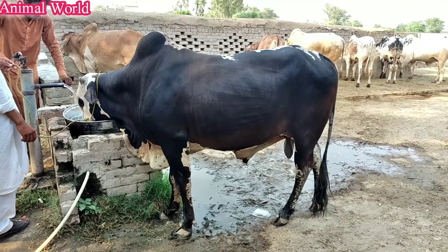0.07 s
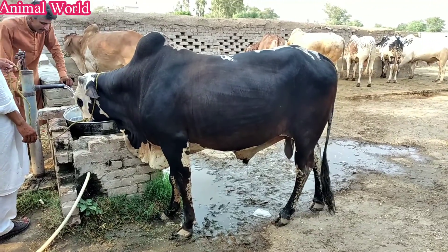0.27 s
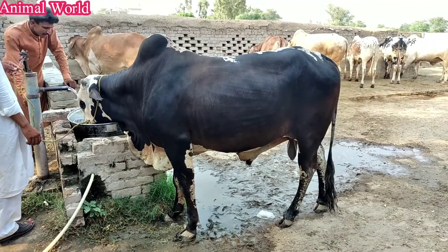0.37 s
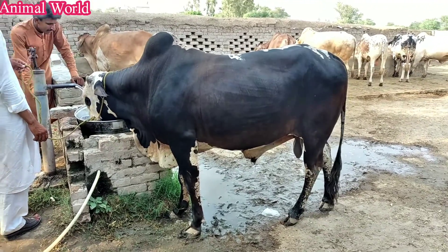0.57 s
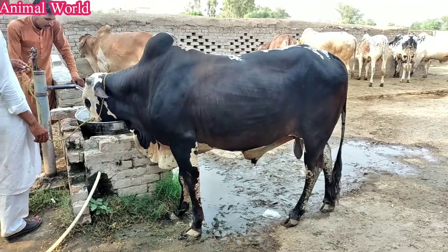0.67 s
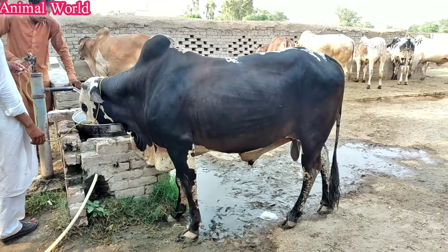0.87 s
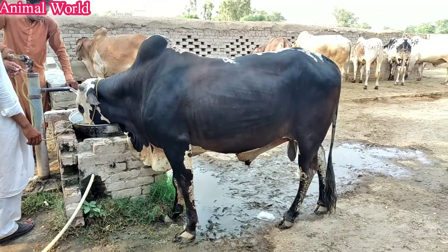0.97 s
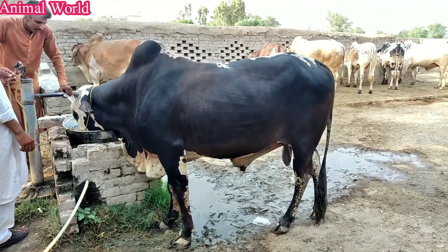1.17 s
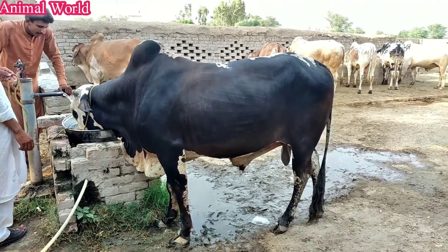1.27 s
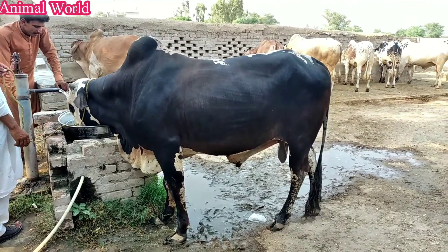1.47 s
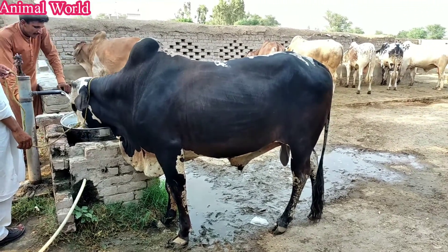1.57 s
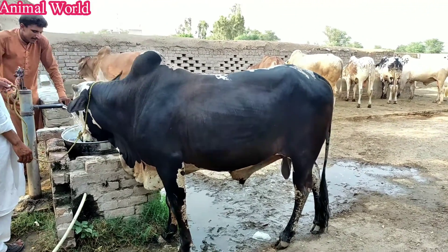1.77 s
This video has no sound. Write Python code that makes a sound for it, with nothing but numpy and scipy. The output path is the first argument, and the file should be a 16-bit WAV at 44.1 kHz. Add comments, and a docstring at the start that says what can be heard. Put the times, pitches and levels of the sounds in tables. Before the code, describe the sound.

A bull drinks from a metal bowl: a strong squelching slurp, a softer lip smack, then two more sharp slurps with gulps and faint bowl plinks, close up in a quiet brick-walled yard.

```python
"""In a brick-walled farmyard a bull drinks from a metal bowl: three sharp slurps and a softer smack of the lips.
Each slurp draws air and water past the lips: crackling noise and bubble rings make a wet squelch and fine spray.
Wavering tones make the lip squeaks, the plinking bowl and the hollow gulps; low noise makes thuds and sloshes.
Decaying noise gives the short echo off the walls, and steady coloured noise the faint outdoor murmur of air."""
import sys
import numpy as np
from scipy import signal
from scipy.fft import rfft, irfft, next_fast_len
from scipy.io import wavfile
from scipy.ndimage import uniform_filter1d

SR = 44100
rng = np.random.default_rng(int(sys.argv[2]) if len(sys.argv) > 2 else 0)


def wav_record(signal):
    """Record a signal, one row per channel, as 16-bit PCM in the file named by sys.argv[1]."""
    frames = np.transpose(np.atleast_2d(signal))
    bounded = np.clip(frames, -1, 1)
    # unit amplitude maps onto the largest positive 16-bit level
    quanta = np.round(bounded * 32767).astype(np.int16)
    wavfile.write(sys.argv[1], SR, quanta)


N = 79380
T = np.arange(N) / SR
EVENT_T = T[:SR // 4]  # time within one short event
SIZE = next_fast_len(N + 8192)  # padded length for filtering
HZ = np.fft.rfftfreq(SIZE, 1 / SR)

# colour of the wet squelch, for both its noise and its bubbles: f/Hz, relative level/dB per Hz
SQUELCH_COLOUR = [(200, -20), (600, -5), (900, 1), (1550, 2), (2650, 2.5), (3250, -8), (4200, -19),
                  (16000, -65)]


def sucks():
    """Air and water rush past the lips: a wet squelch that makes the bowl sing, a fine spray and tiny ticks."""
    # bursts of suction: t/s, rise/s, time to fade 20 dB/s, squelch level before trim/dB, spray level before trim/dB
    suction = [(-.01, .01, .1, -64, -54), (.126, .005, .025, -51, -41), (.136, .005, .025, -41, -48),
               (.166, .022, .045, -44, -43), (.208, .005, .02, -32, -26), (.226, .003, .03, -30, -32),
               (.239, .005, .015, -22, -22), (.263, .003, .025, -31, -43), (.276, .008, .03, -30, -38),
               (.557, .003, .03, -41, -51), (.585, .016, .06, -51, -52), (.637, .003, .026, -42, -64),
               (.77, .016, .06, -45, -46), (.825, .002, .05, -50, -46), (.857, .004, .03, -53, -39),
               (.883, .004, .03, -44, -42), (.893, .005, .028, -28, -25), (.918, .012, .04, -36, -44),
               (.943, .005, .016, -35, -39), (.96, .012, .08, -59, -51), (1.145, .048, .04, -50, -50),
               (1.23, .008, .024, -40, -32), (1.255, .02, .04, -38, -38), (1.274, .012, .03, -33, -35),
               (1.292, .005, .035, -27, -39), (1.318, .008, .028, -36, -54)]
    # tiny bubbles bursting: t/s, relative level/dB
    tick_times = [(.21, -43), (.826, -37), (.859, -55), (.896, -39), (1.232, -47)]
    # colour of the fine spray: f/Hz, relative level/dB per Hz
    spray_colour = [(1000, -35), (3200, -18), (4300, -6), (5200, -1.5), (6700, 1), (7700, -11),
                    (10000, -17.5), (16000, -35)]
    # colour of the ticks: f/Hz, relative level/dB per Hz
    tick_colour = [(1000, -30), (12000, 0), (16000, -8)]
    squelch_trim_db, spray_trim_db = 4, -.5
    bubble_share = .6  # share of the squelch power
    bowl_hz, bowl_width_hz, bowl_db = 1071, 32, 3  # bowl resonance, added to the direct squelch
    tick_rise_s, tick_fade_s = .0005, .008

    froth = np.sqrt(1 - bubble_share) * crackle(SQUELCH_COLOUR) + np.sqrt(bubble_share) * bubbles()
    squelch_envelope = bursts((s, rise, fade, db) for s, rise, fade, db, _ in suction)
    squelch = steady(froth, size=400) * squelch_envelope
    spray_envelope = bursts((s, rise, fade, db) for s, rise, fade, _, db in suction)
    spray = steady(crackle(spray_colour), size=400) * spray_envelope

    bowl_resonance = amp(bowl_db) / (1 + 2j * (HZ - bowl_hz) / bowl_width_hz)
    squelch = shape(squelch, 1 + bowl_resonance)

    hiss = unit(shape(rng.standard_normal(N), amp(read(tick_colour, HZ))))
    ticks = hiss * bursts((s, tick_rise_s, tick_fade_s, db) for s, db in tick_times)
    return amp(squelch_trim_db) * squelch + amp(spray_trim_db) * spray + ticks


def bubbles(count=48):
    """A swarm of small bubbles, each a brief ring that rises in pitch."""
    # lowest and highest starting pitch of the bubbles: f/Hz
    pitch_range = (800, 3300)
    bubbles_per_s = 900  # mean, over all pitches together
    cycles = 9  # a bubble dies to 1/e in this many cycles of its starting pitch
    pitch_rise = .04  # share by which its pitch climbs meanwhile
    out = np.zeros(N)
    for hz in np.geomspace(*pitch_range, count):
        age = EVENT_T * hz / cycles
        turns = np.cumsum(hz * (1 + pitch_rise * age)) / SR
        ring = np.exp(-age) * np.sin(2 * np.pi * turns)
        born = rng.random(N) < bubbles_per_s / count / SR
        births = born * rng.standard_normal(N)
        out += hz * amp(read(SQUELCH_COLOUR, hz)) * signal.oaconvolve(births, ring)[:N]
    return steady(unit(out)[None], size=900)


def squeaks():
    """Narrow gaps between wet lips whistle roughly: brief tones of unsteady pitch."""
    # squeaks of wet lips: t/s, relative level/dB, f/Hz
    whistles = [(.134, -46, 1970), (.24, -31, 1900), (.242, -31, 2600), (.558, -45, 2560),
                (.777, -41, 2830), (.796, -46, 2520), (.894, -28, 2440), (1.281, -35, 2550)]
    rise_s, fade_s, waver = .005, .026, .035  # fade is per 20 dB; waver is the rms share of the pitch
    out = np.zeros(N)
    for s, db, hz in whistles:
        turns = np.cumsum(hz * (1 + waver * wander(size=40))) / SR
        tone = np.sin(2 * np.pi * turns)
        add(out, s, np.sqrt(2) * amp(db) * swell(rise_s, fade_s) * tone)
    return out


def plinks():
    """Each pop rings the modes of the bowl for a moment; the moving water makes its pitch waver."""
    # pops that ring the bowl: t/s, relative level/dB, f/Hz
    pops = [(.114, -45, 1050), (.129, -31, 1080), (.177, -31, 1070), (.206, -29, 770), (.2114, -18, 1060),
            (.232, -19, 1090), (.243, -12, 1072), (.638, -33, 1090), (.823, -39, 1040), (.858, -35, 1060),
            (.894, -22, 1045), (.897, -26, 900), (.948, -36, 1020), (1.234, -31, 1070), (1.282, -28, 1075),
            (1.304, -29, 1050)]
    # modes of the bowl: ratio to the pitch, relative level/dB
    modes = [(1, 0), (1.145, -21), (2.36, -23)]
    rise_s, fade_s, waver = .004, .026, .018  # fade is per 20 dB; waver is the rms share of the pitch
    pan_db = 1.5  # up on the left, down on the right
    out = np.zeros(N)
    for s, db, hz in pops:
        turns = np.cumsum(hz * (1 + waver * wander(size=60))) / SR
        ring = sum(amp(mode_db) * np.sin(2 * np.pi * ratio * turns) for ratio, mode_db in modes)
        add(out, s, np.sqrt(2) * amp(db) * swell(rise_s, fade_s) * ring)
    return out * amp([[pan_db], [-pan_db]])


def gulps():
    """Hollow, wavering tones of air pockets that glide as they shrink or swell."""
    # air pockets in the mouth: t/s, time to fade 20 dB/s, relative level/dB, starting f/Hz, glide/Hz per s
    pockets = [(.13, .022, -44, 390, 300), (.178, .06, -38, 455, 900), (.208, .018, -31, 480, 600),
               (.226, .03, -35, 122, 0), (.248, .03, -32, 420, -900), (.282, .055, -33, 340, -600),
               (.293, .028, -35, 475, 200), (.564, .07, -38, 365, -300), (.637, .016, -35, 385, 600),
               (.664, .025, -42, 360, 100), (.776, .07, -43, 338, -200), (.853, .05, -45, 325, -500),
               (.898, .024, -29.5, 380, 2200), (.932, .028, -36, 460, -400), (1.163, .09, -44, 380, 700),
               (1.231, .02, -33, 365, 3500), (1.259, .05, -34, 480, 500), (1.29, .055, -24.5, 335, 200),
               (1.312, .045, -29, 255, 200), (1.39, .08, -45, 275, -100), (1.593, .03, -42, 180, 100)]
    rise_s, waver = .012, .07  # waver is the rms share of the starting pitch
    out = np.zeros(N)
    for s, fade, db, hz, glide in pockets:
        pitch = hz * (1 + waver * wander(size=100)) + glide * EVENT_T
        tone = np.sin(2 * np.pi * np.cumsum(pitch) / SR)
        add(out, s, np.sqrt(2) * amp(db) * swell(rise_s, fade) * tone)
    return out


def sloshes():
    """Water drops back into the bowl with a thud and churns: two low bands of crackling noise."""
    # water falling back: t/s, rise/s, time to fade 20 dB/s, relative thud level/dB, relative churn level/dB
    falls = [(.222, .018, .04, -31, -30), (.275, .016, .045, -45, -35), (.636, .008, .03, -52, -40),
             (.89, .008, .05, -49, -41), (1.286, .008, .045, -29, -30.5), (1.315, .018, .042, -50, -29.5),
             (1.597, .005, .035, -45, -53)]
    # colour of the low thud: f/Hz, relative level/dB per Hz
    thud_colour = [(20, -30), (52, -5), (80, -15), (120, 0), (260, 0), (700, -35), (2000, -70)]
    # colour of the churning: f/Hz, relative level/dB per Hz
    churn_colour = [(100, -35), (250, -2), (490, 0), (600, -11), (800, -14), (4000, -60)]
    thud_envelope = bursts((s, rise, fade, db) for s, rise, fade, db, _ in falls)
    thud = steady(crackle(thud_colour), size=900) * thud_envelope
    churn_envelope = bursts((s, rise, fade, db) for s, rise, fade, _, db in falls)
    churn = steady(crackle(churn_colour), size=600) * churn_envelope
    return thud + churn


def crackle(colour):
    """A dense run of bursting bubbles of uneven size, in one colour, more scattered in the treble."""
    grain_db, grain_s = 4.5, .0012  # rms unevenness before limiting, and length, of the bursts
    spread, spread_hz = .45, 450  # greatest power share that differs between the ears; half of it at this pitch
    unevenness = unit(uniform_filter1d(rng.standard_normal(N), max(2, int(grain_s * SR))))
    sizes = amp(grain_db * np.clip(unevenness, -2, 2))
    apart = np.clip(spread, 0, 1) * HZ ** 2 / (HZ ** 2 + spread_hz ** 2)
    gain = amp(read(colour, HZ))
    shared = rng.standard_normal(N) * sizes
    own = rng.standard_normal((2, N)) * sizes
    return unit(shape(shared, gain * np.sqrt(1 - apart)) + shape(own, gain * np.sqrt(apart)))


def near(x):
    """Quick reflections from bowl and trough: sparse, dying taps, different at each ear."""
    level_db, t60_s, taps_per_s = -4, .09, 1500  # level is relative to the direct sound
    t = T[:SR // 10]
    strengths = rng.standard_normal((2, len(t)))
    present = rng.random((2, len(t))) < taps_per_s / SR
    taps = strengths * present * amp(-60 * t / t60_s)
    taps /= np.linalg.norm(taps, axis=1, keepdims=True)
    reflected = signal.fftconvolve(x, taps, axes=1)[:, :N]
    return (x + amp(level_db) * reflected) / np.sqrt(1 + amp(level_db) ** 2)


def yard(x):
    """The echo of the brick walls: a noise tail, each band dying at its own speed."""
    # echo of the walls: f/Hz, relative level/dB, time to die by 60 dB/s
    walls = np.array([(100, -25, .3), (300, -14, .5), (1000, -17, .35), (2500, -19, .28), (4000, -20, .22),
                      (6000, -11, .25), (9000, -10, .3), (15000, -17, .22)])
    hz, t, bands = signal.stft(rng.standard_normal((2, SR)), SR, nperseg=256)
    t60 = read(walls[:, [0, 2]], hz)[:, None]
    decay = amp(read(walls[:, :2], hz)[:, None] - 60 * t / t60)
    gain = decay * np.sqrt(2 * np.log(1000) / (t60 * SR))  # equal energy for long and short tails
    tail = signal.istft(bands * gain, SR, nperseg=256)[1][:, :SR]
    tail = tail * np.minimum(T[:SR] / .012, 1)  # 12 ms fade-in
    return signal.fftconvolve(x, tail, axes=1)[:, :N]


def air():
    """The dull background of the open yard: coloured noise, partly alike at both ears."""
    # colour of the air: f/Hz, relative level/dB per Hz
    air_colour = [(20, -15), (48, -1), (150, -16), (280, -10), (420, -17), (750, -10), (1100, -16),
                  (1900, -21.5), (2600, -28), (3400, -48), (15000, -66)]
    # loudness of the air over time: t/s, level/dB
    air_level = [(0, -54), (.08, -56), (1.66, -57), (1.74, -52)]
    # likeness of left and right: f/Hz, correlation
    likeness = [(50, .9), (1000, .5), (4000, .3)]
    a, b = rng.standard_normal((2, N))
    same = np.clip(read(likeness, HZ), -1, 1)
    gain = amp(read(air_colour, HZ))
    left = shape(a, gain)
    right = shape(a, gain * same) + shape(b, gain * np.sqrt(1 - same ** 2))
    return unit(np.array([left, right])) * amp(np.interp(T, *np.transpose(air_level)))


def amp(db):
    """Decibels to gain."""
    return 10 ** (np.asarray(db) / 20)


def unit(x):
    """Scales to rms 1."""
    return x / np.sqrt(np.mean(x ** 2) + 1e-20)


def read(points, hz):
    """Reads a table on a log-frequency axis."""
    f, value = np.transpose(points)
    return np.interp(np.log(hz + 1), np.log(f + 1), value)


def shape(x, gain):
    """Filters by a gain for each frequency."""
    return irfft(rfft(x, SIZE) * gain, SIZE)[..., :N]


def steady(x, size):
    """Evens out the level over size samples, jointly for all channels."""
    return x / np.sqrt(uniform_filter1d(np.mean(x ** 2, axis=0), size) + 1e-9)


def swell(rise, fade):
    """Rises smoothly, then dies by 20 dB in each fade time."""
    attack = np.sin(np.pi / 2 * np.minimum(EVENT_T / rise, 1))
    return attack * amp(-20 * np.maximum(EVENT_T - rise, 0) / fade)


def bursts(rows):
    """The joint envelope of rows: t/s, rise/s, fade/s, level/dB."""
    out = np.zeros(N)
    for s, rise, fade, db in rows:
        add(out, s, amp(db) * swell(rise, fade))
    return out


def wander(size):
    """Random drift of rms 1 for the length of one event, smoothed over size samples."""
    return unit(uniform_filter1d(rng.standard_normal(len(EVENT_T)), size))


def add(mix, s, sound):
    """Mixes a sound in at time s, cutting what falls outside."""
    at = round(s * SR)
    sound = sound[max(-at, 0):]
    part = mix[max(at, 0):][:len(sound)]
    part += sound[:len(part)]


def scene():
    """The drinking reaches the right microphone first; the yard answers over the murmur of air."""
    # balance of the drinking between the ears: f/Hz, left minus right/dB
    balance = [(200, .5), (650, -3.5), (1100, 1), (3000, 0), (5500, 11.5), (7000, 5.5), (9000, -2.5),
               (15000, -7)]
    left_lag_s = .00023
    mouth = near(sucks() + squeaks()) + plinks() + gulps() + sloshes()
    side = amp(np.array([[.5], [-.5]]) * read(balance, HZ))
    side_gain = side / np.sqrt(np.mean(side ** 2, axis=0))  # keeps the mean power of the pair
    lag = np.exp(-2j * np.pi * HZ * np.array([[left_lag_s], [0]]))
    mouth = shape(mouth, side_gain * lag)
    return mouth + yard(mouth) + air()


def record(dry):
    """The recorder's band limit: a steep low-pass filter."""
    lowpass = signal.firwin(511, 16000, window=("kaiser", 9), fs=SR)  # cutoff in Hz
    return signal.oaconvolve(dry, lowpass[None], "same")


dry = scene()
out = record(dry)
wav_record(out)
```